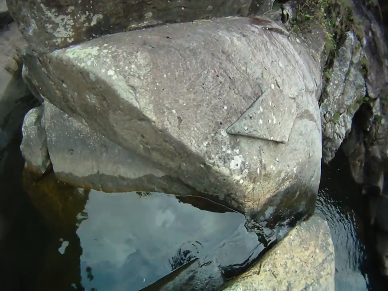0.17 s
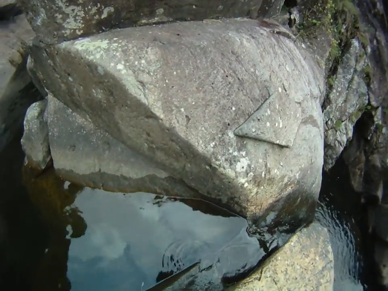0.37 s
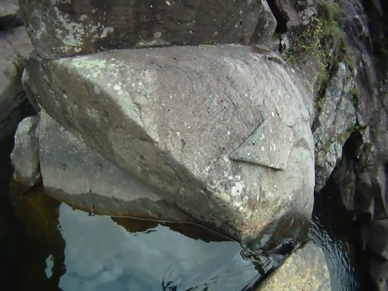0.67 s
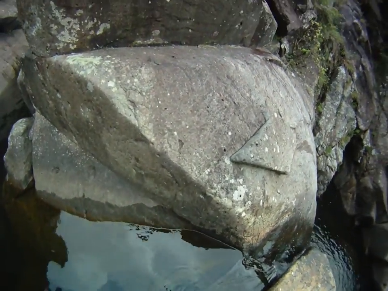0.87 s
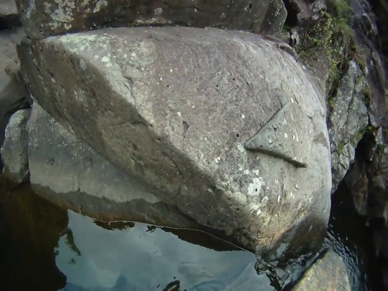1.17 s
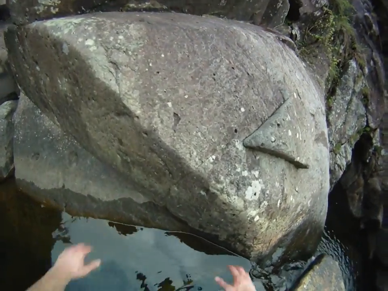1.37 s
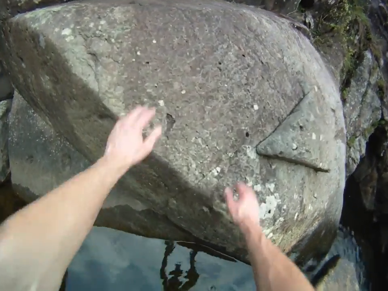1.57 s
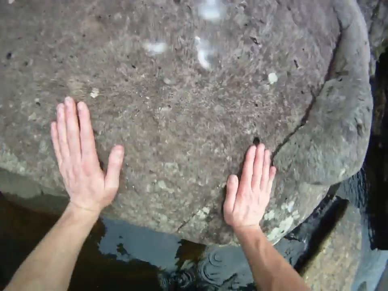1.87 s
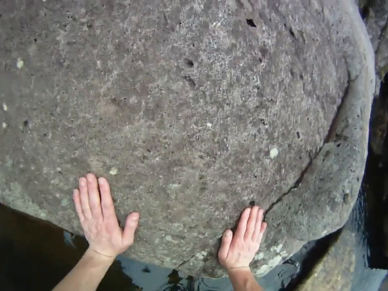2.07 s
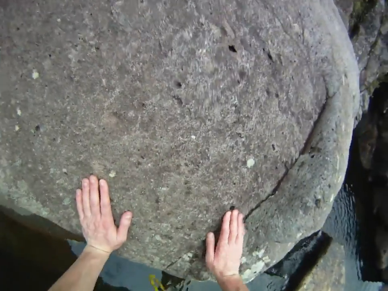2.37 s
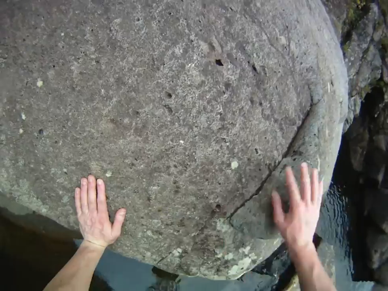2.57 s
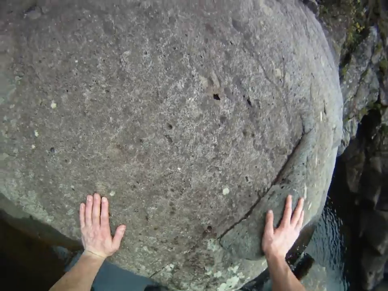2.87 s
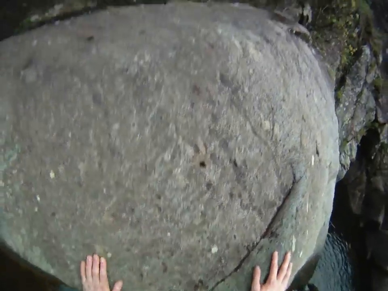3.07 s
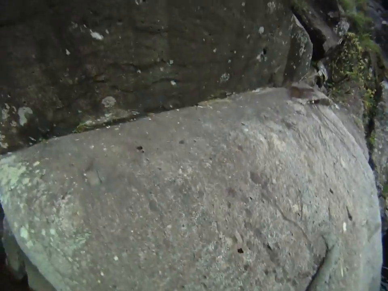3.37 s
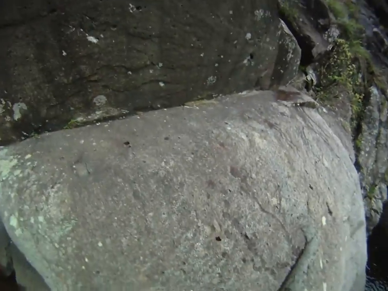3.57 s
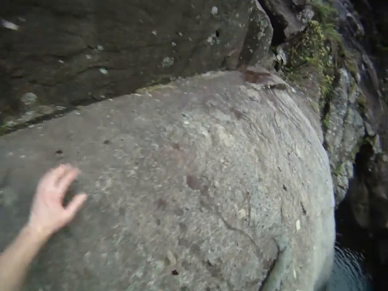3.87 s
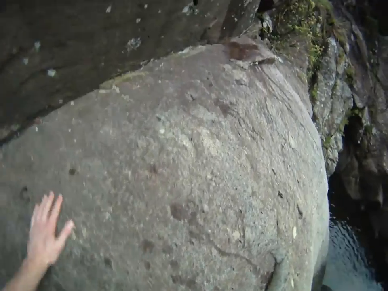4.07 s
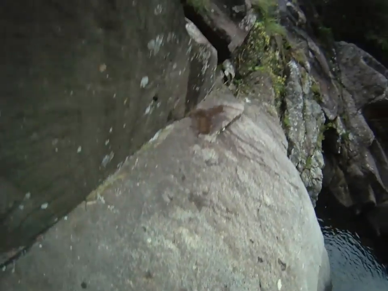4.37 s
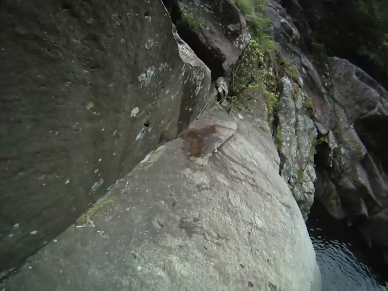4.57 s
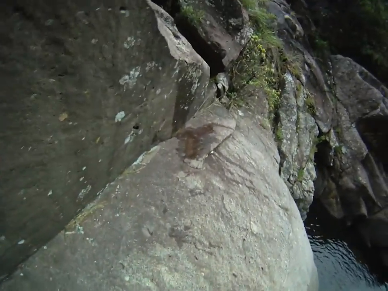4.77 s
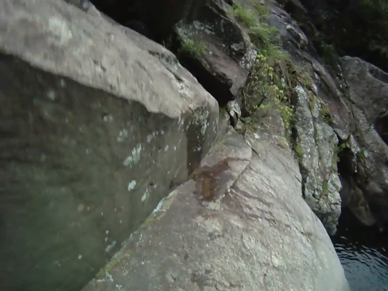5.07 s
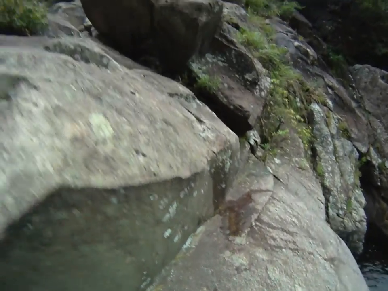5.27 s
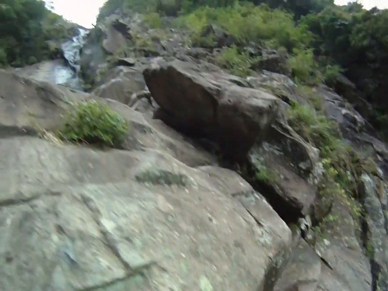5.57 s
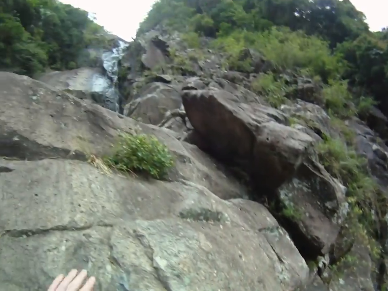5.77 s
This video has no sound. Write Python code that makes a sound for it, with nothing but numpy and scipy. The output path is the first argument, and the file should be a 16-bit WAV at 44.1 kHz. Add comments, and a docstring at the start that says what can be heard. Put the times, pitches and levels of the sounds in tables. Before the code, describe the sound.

A climber's head-mounted camera in a sealed case hears nearby waterfall and stream as a steady, nasal, muffled hiss over faint rumble. Small low shudders come first, then a cluster of hard thumps and knocks around 1.8 seconds as hands land on the boulder. Afterwards come sparse scuffs, soft palm pats and tiny plastic ticks, with the water continuing.

```python
"""A camera in a sealed housing on a climber's head, near a waterfall and a stream.
From the start, random splashes excite the housing's resonances, over rumble and a restless tremble of the mount.
From 0.6 s, moves shudder the strap and scuff the rock; from 1.75 to 1.9 s a hard landing strikes the housing.
From 2 s, small hard parts tick and ring among further scuffs, pats and shudders.
The recorder samples slowly and holds each sample, so the whole sound is mirrored into the treble."""
import sys
import numpy as np
from scipy import signal
from scipy.fft import rfft, irfft
from scipy.io import wavfile
from scipy.ndimage import uniform_filter1d

SR = 44100
rng = np.random.default_rng(int(sys.argv[2]) if len(sys.argv) > 2 else 0)


def inscribe(sig):
    """Save sig as 16-bit PCM at rate SR to the path in sys.argv[1].

    A 1-D sig is mono; a 2-D sig holds one channel per row.
    Samples are clipped to [-1, 1] before scaling.
    """
    pcm = np.round(np.clip(np.atleast_2d(sig).T, -1, 1) * 32767)
    wavfile.write(sys.argv[1], SR, pcm.astype(np.int16))


N = 261072
T = np.arange(N) / SR  # time in seconds

# Moves that shake the mount on its strap. Each row: middle in seconds, peak level in dB, length in seconds.
JOLTS = [(0.621, -34.5, 0.071), (0.716, -34.5, 0.055), (1.113, -40, 0.16), (1.35, -40, 0.094),
         (1.49, -33, 0.11), (1.58, -30, 0.11), (1.672, -35, 0.089), (1.742, -21.5, 0.055),
         (1.786, -13.5, .06), (1.852, -12.5, 0.078), (1.908, -15, 0.083), (2.105, -33, 0.32),
         (2.298, -36, 0.12), (2.77, -38.5, .12), (2.906, -27.5, 0.059), (3.055, -31, 0.11),
         (3.153, -35.5, 0.27), (3.45, -44, 0.14), (3.743, -43, 0.26), (3.965, -30, 0.038),
         (4.053, -38, 0.14), (4.185, -38.5, 0.23), (4.52, -30, 0.094), (4.624, -37.5, 0.08),
         (4.84, -35, 0.19), (4.995, -41, 0.054), (5.147, -34, 0.14), (5.358, -36, 0.083),
         (5.454, -33.5, 0.057)]
# The small shaking that never stops: level and wander in dB, new wander targets per second.
TREMBLE_DB, TREMBLE_WANDER_DB, TREMBLE_WANDER_PER_S = -46, 3, 14
# The strap resonance; the width is that of a single pass of the filter.
SHUDDER_HZ, SHUDDER_WIDTH_HZ = 37.06, 29.2
EVENNESS = 0.8  # share of the noise's own beating removed, 0 to 1
SHUDDER_ADVANCE_S, SHUDDER_TOP_HZ = 0.0087, 50

# Dull blows that push the whole housing. Each row: start in seconds, level in dB, push length in seconds.
THUDS = [(1.774, -25.5, 0.0064), (1.825, -15.5, 0.0033), (1.844, -39, 0.0014), (1.864, -25.5, 0.0033),
         (1.889, -20, 0.0071), (2.9, -45, 0.003), (3.225, -44, 0.003)]
# Low modes of the mount. Each row: frequency at the blow in Hz, level in dB, time to fall 60 dB in seconds.
THUD_MODES = [(96, -9.5, 0.19), (132, -7, 0.11), (186, -11.5, 0.15), (273, 2, 0.028)]
THUD_SAG, THUD_SAG_S = 0.44, 0.05  # share of the pitch lost, time constant

# Scuffs and knocks carried through the body.
# Each row: start in seconds, peak level in dB, hardness in dB per octave, time to fall 60 dB in seconds.
SCUFFS = [(0.6075, -49, 6, 0.028), (1.7703, -38.5, 1.5, 0.036), (1.8322, -23.5, 3.5, 0.018),
          (1.835, -34.5, -5, 0.051), (1.8755, -34, 1, 0.035), (1.929, -44, -4, 0.017),
          (1.9664, -40, -1.5, 0.024), (2.393, -47, -1, 0.044), (2.8697, -40.5, -4, 0.034),
          (3.101, -51, 9, 0.033), (3.761, -40, 1, 0.06), (3.851, -39, 5, 0.048), (3.865, -43, 4, 0.045),
          (3.88, -47, 8.5, 0.027), (4.274, -38, 3, 0.027), (4.688, -38, 5, 0.02), (4.943, -49, 12, 0.03),
          (5.0873, -39, 6, 0.026), (5.304, -43, 3, 0.051), (5.559, -49, 12, 0.029)]
# Broad resonances of the body that carries scuffs, the strongest first.
# Each row: frequency in Hz, single-pass width in Hz, level in dB before hardness tilts it.
BODY_MODES = [(2160, 820, 0.5), (1070, 590, -10), (2960, 2000, -11.5), (3560, 420, -4.5), (4850, 2400, -10)]
# Soft pats of a palm on rock. Each row: start in seconds, peak level in dB, time to fall 60 dB in seconds.
PATS = [(1.755, -42, 0.049), (1.824, -26, 0.045), (1.843, -31.5, 0.051), (1.867, -32, 0.058),
        (2.961, -42, 0.052), (2.97, -35.5, 0.048), (2.979, -35, 0.019), (3.755, -56, 0.034)]
# Soft low resonances that carry pats. Each row: frequency in Hz, single-pass width in Hz, relative level in dB.
PAT_MODES = [(527, 480, -5), (992, 400, 4.5)]

# Small hard parts of the housing that tick and ring.
# Each row: start in seconds, tone level in dB, pitch in Hz, latch ring level in dB, time to fall 60 dB in seconds.
TICKS = [(2.0607, -41.5, 4050, -51, 0.092), (2.808, -54, 3870, -50, 0.07), (2.8255, -52, 3930, -56, 0.07),
         (3.4131, -43.5, 3420, -59, 0.065), (4.184, -48, 3780, -49, 0.1), (4.4024, -39, 3680, -41.5, 0.053),
         (4.4924, -37, 3750, -41, 0.057), (4.514, -48, 3700, -48, 0.07), (5.0574, -35.5, 3810, -51, 0.028)]
LATCH_HZ, LATCH_WIDTH_HZ = 5370, 470

# Water as the head turns. Each row: time in seconds, level in dB, brightness in dB,
# extra level of the shoulder above the main resonance in dB; each group takes its own share of the last two.
WATER = [(0.0, -49.5, -2.5, 1), (0.5, -51.5, -3, -1.5), (0.9, -51, 0.5, 1.5), (1.2, -52, 1.5, -3),
         (1.5, -51.5, -0.5, -1.5), (1.88, -49, -1.5, -2), (2.37, -52, 1.5, -4.5), (2.7, -51, -1, -11),
         (3.1, -50.5, 0, -1), (3.43, -49.5, 0, 3.5), (3.7, -51.5, 4, 3.5), (4.05, -50, -2.5, -1),
         (4.5, -50, 1.5, 3.5), (4.8, -48, -1.5, 3.5), (5.1, -51.5, 3.5, 5), (5.51, -53, 4, 3),
         (5.92, -52.5, 2, 1.5)]
# Housing resonances in six groups: low, main, shoulder, upper, high, top.
# Each row of a group: frequency in Hz, single-pass width in Hz, relative level in dB.
HOUSING = [
    [(776, 890, 3), (1048, 416, 7), (1355, 450, 0.5)],
    [(2006, 330, -0.5), (2228, 433, 6)],
    [(2510, 210, -1), (2793, 325, 0.5)],
    [(3392, 110, 5.5), (3757, 560, 7), (4260, 910, -0.5)],
    [(4663, 300, -7)],
    [(5377, 740, 0)],
]
# How each group hears the water. Each row: offset from the water level in dB, share of brightness followed,
# share of the shoulder's extra level followed.
GROUPS = [(-9, .3, -0.018), (2, 0.035, 0.039), (-9, .1, 1.1), (-7, .9, 0.15), (-11, .3, -0.31),
          (-10, .8, 0.08)]

# Spectrum of wind and body rumble through the housing wall. Each row: frequency in Hz, relative level in dB.
RUMBLE_SPECTRUM = [(35, -38), (60, -8.5), (68, -7), (81, -17.5), (130, -21), (280, -27), (600, -32.5),
                   (780, -49), (1320, -120)]
RUMBLE_DB = -57.5  # before the moves swell it
RUMBLE_FOLLOWS = 0.18  # share of the shaking's dB that the rumble takes over

SLOW_SR, HOLD = 12000, 4  # recorder's samples per second, steps for which each is held
SOFT_HZ, TOP_HZ = 5600, 15260  # low-pass cutoffs before and after the recorder


def undb(db):
    """Decibels as an amplitude ratio."""
    return 10 ** (np.asarray(db) / 20)


def level(x, db):
    """Normalization: the whole signal is scaled to one root-mean-square level."""
    return x * undb(db) / np.sqrt(np.mean(x ** 2))


def ring(x, hz, width_hz):
    """Resonance: a peak filter applied twice has steep skirts."""
    b, a = signal.iirpeak(hz, hz / width_hz, SR)
    return signal.lfilter(b, a, signal.lfilter(b, a, x))


def resonate(sources, modes):
    """Modal superposition: each resonance has its own drive, and their outputs add."""
    return sum(undb(db) * ring(x, hz, width_hz) for x, (hz, width_hz, db) in zip(sources, modes))


def walk(rate):
    """Slow random variation: levels held 1 / rate seconds and slewed twice, with a spread near 1."""
    hold = int(SR / rate)
    steps = np.repeat(rng.standard_normal(N // hold + 1), hold)
    smooth = uniform_filter1d(uniform_filter1d(steps, hold), hold)
    return 1.25 * smooth[:N]


def decay(t, decay_s):
    """Exponential damping: a fall of 60 dB in decay_s."""
    return np.exp(-np.log(1000) * t / decay_s)


def fade(start_s, decay_s, rise_s):
    """Transient envelope: an exponential rise, then exponential damping."""
    t = np.maximum(T - start_s, 0)
    return (1 - np.exp(-t / rise_s)) * decay(t, decay_s)


def bursts(modes, rows, rise_s):
    """Friction noise: grit of uneven strength under (start, dB, decay) envelopes excites resonances."""
    unevenness = rng.standard_normal(N // 40 + 1).repeat(40)[:N]
    grit = rng.standard_normal((len(modes), N)) * undb(1.2 * unevenness)
    envelope = sum(undb(db) * fade(s, decay_s, rise_s) for s, db, decay_s in rows)
    return resonate(grit * envelope, modes) / np.std(resonate(grit, modes))


def shaking():
    """Base excitation: each jolt swells and fades, adding in power to a restless tremble."""
    jolts = 0
    for middle_s, db, length_s in JOLTS:
        phase = np.clip((T - middle_s) / length_s + 0.5, 0, 1)
        jolts = jolts + undb(db) * np.sin(np.pi * phase) ** 2
    tremble = undb(TREMBLE_DB + TREMBLE_WANDER_DB * walk(TREMBLE_WANDER_PER_S))
    return np.hypot(jolts, tremble)


def shudder(moves):
    """Mass on a spring: noise in the strap resonance, mostly freed of its own beating, follows the moves."""
    analytic = signal.hilbert(ring(rng.standard_normal(N), SHUDDER_HZ, SHUDDER_WIDTH_HZ))
    even = (analytic / np.abs(analytic) ** EVENNESS).real
    shake = level(even, 0) * moves
    early = np.roll(shake, -int(SHUDDER_ADVANCE_S * SR))  # allows for the delay of the low-pass
    # the mass cannot follow faster
    return signal.sosfilt(signal.butter(5, SHUDDER_TOP_HZ, fs=SR, output="sos"), early)


def thuds():
    """Impulse response: half-sine pushes excite low modes, whose pitch sags as the stretched strap relaxes."""
    t = T[:SR // 4]
    # the integral of an exponentially falling pitch
    sagging_t = t * (1 - THUD_SAG) + THUD_SAG * THUD_SAG_S * (1 - np.exp(-t / THUD_SAG_S))
    response = sum(undb(db) * decay(t, decay_s) * np.sin(2 * np.pi * hz * sagging_t)
                   for hz, db, decay_s in THUD_MODES)
    force = np.zeros(N)
    for s, db, push_s in THUDS:
        push = np.sin(np.pi * np.clip((T - s) / push_s, 0, 1))
        force -= undb(db) * push / push.sum()  # equal dB means equal impulse
    return signal.fftconvolve(force, response)[:N]


def scuffs():
    """Contact hardness: harder scuffs put more of their force into the higher body resonances."""
    s, peak_db, hardness, decay_s = np.transpose(SCUFFS)
    out = 0
    for hz, width_hz, db in BODY_MODES:
        octaves = np.log2(hz / BODY_MODES[0][0])
        rows = zip(s, peak_db + db + hardness * octaves, decay_s)
        out = out + bursts([(hz, width_hz, 0)], rows, 0.0013)
    return out


def pats():
    """Soft contact: the slower rise of a palm's pat sounds through low resonances."""
    return bursts(PAT_MODES, PATS, 0.0047)


def ticks():
    """Damped free vibration: each tick rings a close cluster of modes and rattles the latch."""
    tones = 0
    for s, db, hz, _, decay_s in TICKS:
        t = T - s
        cluster = 1 + 0.19 * np.cos(2 * np.pi * 130 * t)  # adds a partial 130 Hz to either side
        tones = tones + undb(db) * fade(s, decay_s, 0.00069) * np.sin(2 * np.pi * hz * t) * cluster
    latch_rows = [(s, latch_db, decay_s) for s, _, _, latch_db, decay_s in TICKS]
    return tones + bursts([(LATCH_HZ, LATCH_WIDTH_HZ, 0)], latch_rows, 0.00025)


def splashes():
    """Shot noise: random hits of uneven strength, about 400 a second, rise suddenly and die in a few ms."""
    hits = (rng.random(N) < 400 / SR) * undb(2.0 * rng.standard_normal(N))
    return level(signal.lfilter([1], [1, -np.exp(-1 / (0.0043 * SR))], hits), 0)


def water():
    """Resonant transmission: splashes shared by all groups or heard in one; each resonance flickers alone."""
    s, level_db, bright_db, shoulder_db = np.transpose(WATER)
    flow = undb(0.76 * walk(12))
    common = splashes()
    out = 0
    for modes, (db, bright, shoulder) in zip(HOUSING, GROUPS):
        strength = flow * (1 + undb(-8) * common + undb(-13.0) * splashes())
        flicker = undb([1.48 * walk(14) for _ in modes])
        # each resonance is driven at its own spot of the wall
        roar = resonate(strength * flicker * rng.standard_normal((len(modes), N)), modes)
        group_db = level_db + db + bright * bright_db + shoulder * shoulder_db
        out = out + level(roar, 0) * undb(np.interp(T, s, group_db))
    return out


def rumble(moves):
    """Spectral shaping: low-frequency noise gusts a little and swells with the moves."""
    hz, db = np.transpose(RUMBLE_SPECTRUM)
    f = np.arange(N // 2 + 1) * SR / N + 1  # 1 Hz added to keep the logarithm finite
    spectrum = undb(np.interp(np.log(f), np.log(hz), db))
    noise = irfft(rfft(rng.standard_normal(N)) * spectrum, N)
    swell = (moves / undb(TREMBLE_DB)) ** RUMBLE_FOLLOWS
    return level(noise * undb(1.6 * walk(7)), RUMBLE_DB) * swell


def scene():
    """Superposition: all sources add, and the same moves drive the shudder and swell the rumble."""
    moves = shaking()
    return (shudder(moves) + thuds() + scuffs() + pats() + ticks() + water() + rumble(moves))[None]


def record(dry):
    """Sample and hold: slow samples held for four steps leave mirror images around 6 and 12 kHz."""
    soft = signal.sosfilt(signal.butter(4, SOFT_HZ, fs=SR, output="sos"), dry)
    slow = signal.resample_poly(soft, SLOW_SR, SR, axis=1)
    held = signal.resample_poly(slow.repeat(HOLD, axis=1), SR, SLOW_SR * HOLD, axis=1)[:, :N]
    return signal.sosfilt(signal.ellip(16, 0.2, 70, TOP_HZ, fs=SR, output="sos"), held)  # cuts the top


dry = scene()
out = record(dry)
inscribe(out)
```